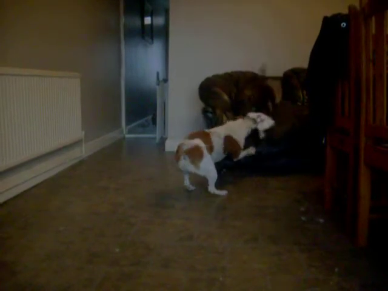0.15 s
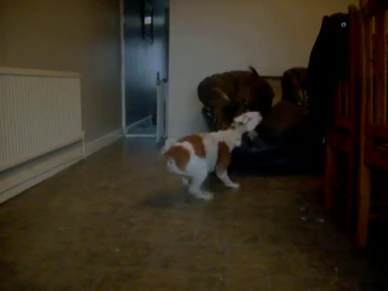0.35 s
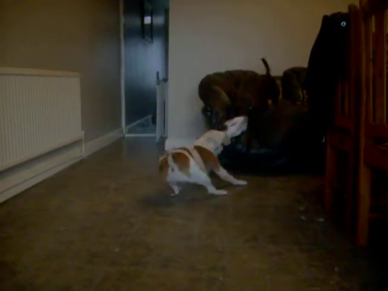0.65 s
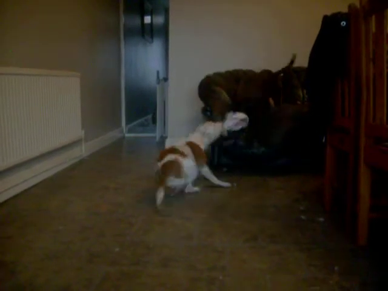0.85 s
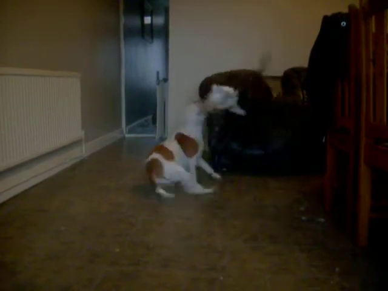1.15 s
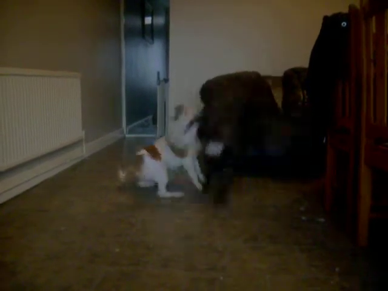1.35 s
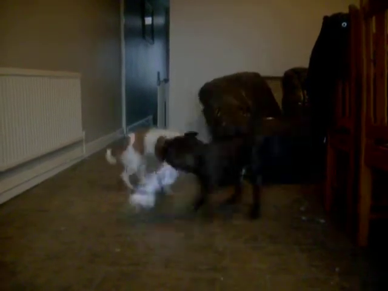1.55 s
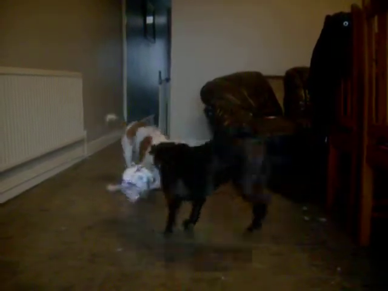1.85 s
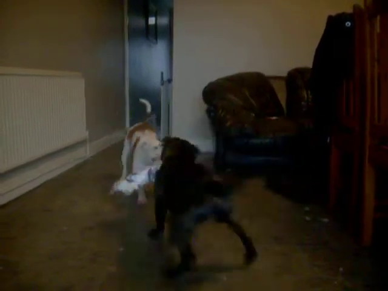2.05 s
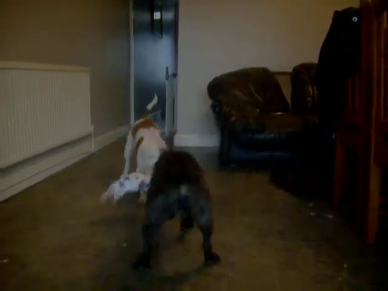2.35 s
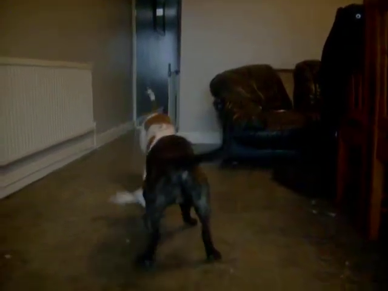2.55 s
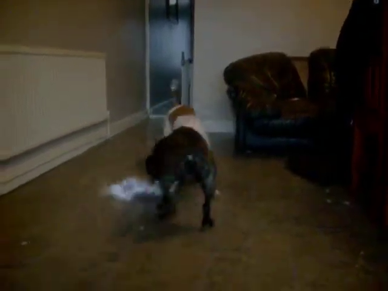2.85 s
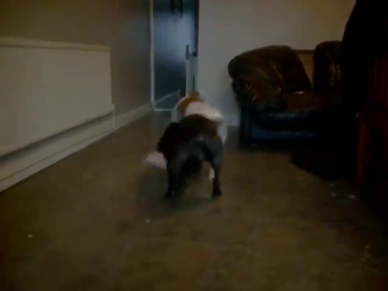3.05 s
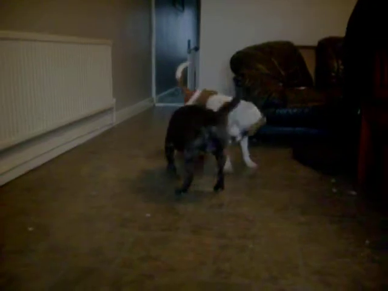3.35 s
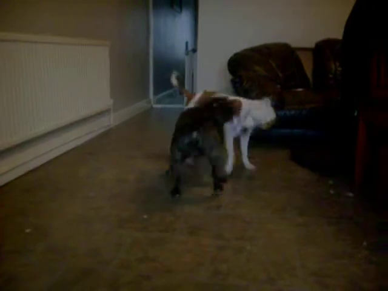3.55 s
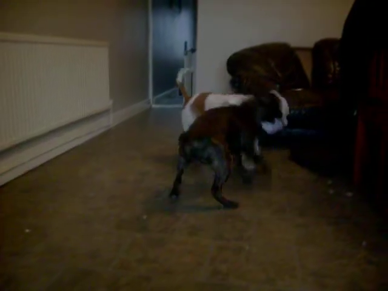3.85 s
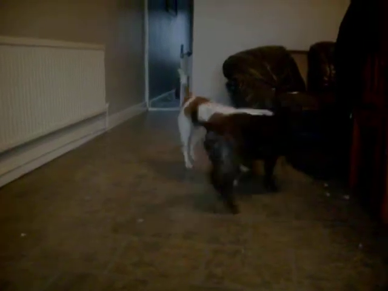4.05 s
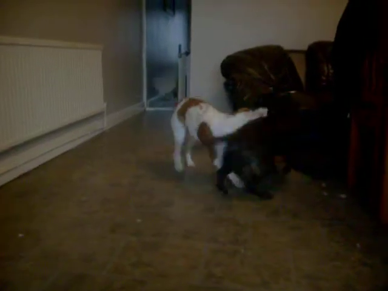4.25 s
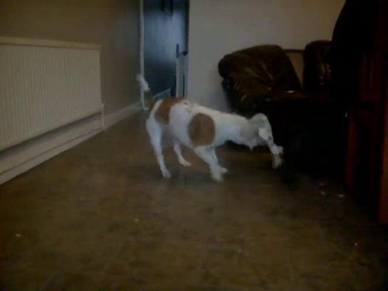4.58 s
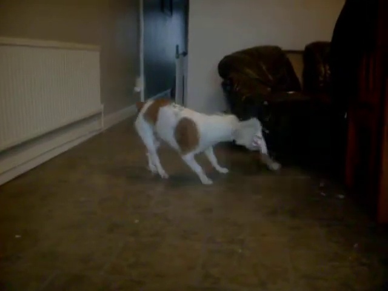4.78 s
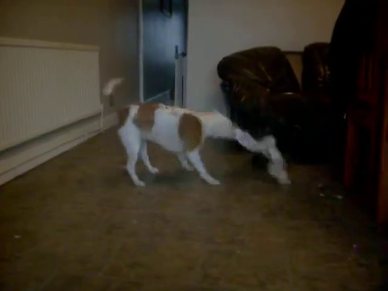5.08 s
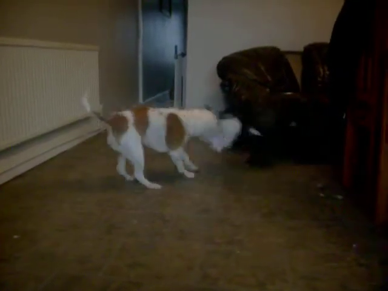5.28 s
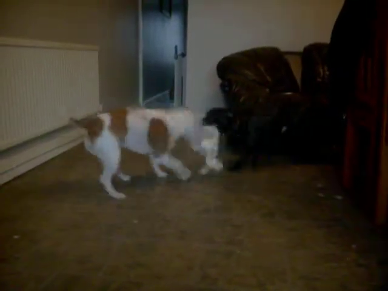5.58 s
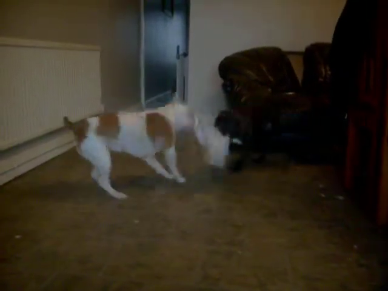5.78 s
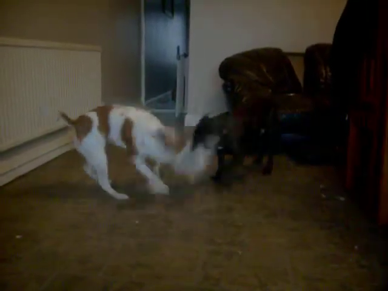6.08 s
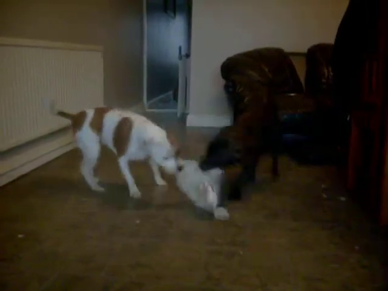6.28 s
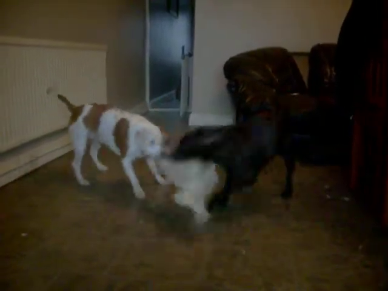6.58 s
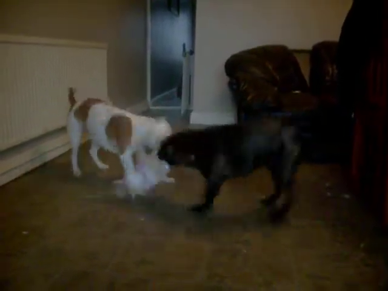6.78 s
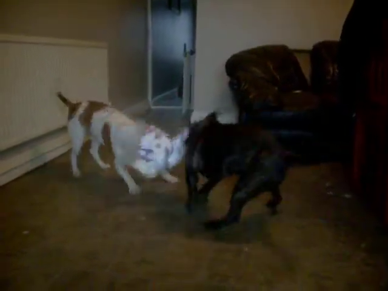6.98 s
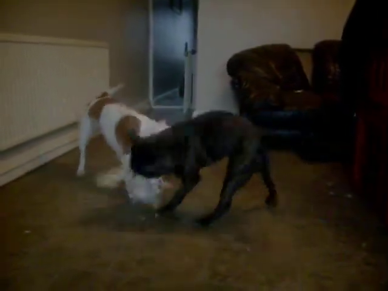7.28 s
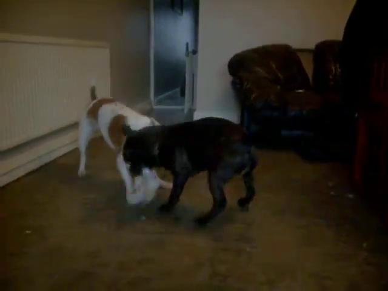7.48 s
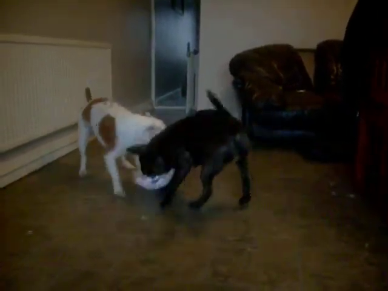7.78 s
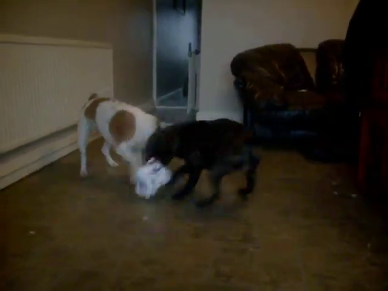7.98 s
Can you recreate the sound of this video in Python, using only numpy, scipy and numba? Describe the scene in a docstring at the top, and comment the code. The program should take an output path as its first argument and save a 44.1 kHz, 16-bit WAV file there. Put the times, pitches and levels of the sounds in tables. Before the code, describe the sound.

Two dogs tug at a cloth in a bare, hard-floored room. Short, low, raspy growls and fluttering snorts come in quick bursts through clenched jaws, while paws skid and scrabble almost constantly. Sharp claw clicks, often doubled, punctuate the struggle. The room rings for about half a second after each, heard a few metres away on a small, thin camera microphone with faint hiss.

```python
"""Two dogs tug at a cloth toy in a bare room with a hard floor, a few metres from a small camera microphone.
From the start they growl through clenched jaws (pulses and rasp ringing in belly, chest, throat and mouth),
snort (fluttering noise in moving resonances) and skid (dense tiny catches over noise). From 0.28 s to the end
come short cracks, each with a second one close by: mostly claw strikes, with a few scuffs and snort onsets.
The room rings around it all for about half a second (fading noise and low modes), over a faint steady hiss."""
import sys
import numpy as np
from scipy import signal
from scipy.fft import rfft, irfft
from scipy.io import wavfile
from scipy.ndimage import uniform_filter1d
from numba import njit

SR = 44100
rng = np.random.default_rng(int(sys.argv[2]) if len(sys.argv) > 2 else 0)


def store_wav(level_fs):
    """Save 16-bit WAV to argv[1]."""
    pcm = np.round(np.clip(np.atleast_2d(level_fs), -1, 1) * 32767)
    wavfile.write(sys.argv[1], SR, pcm.T.astype(np.int16))


def amplitude_ratio(level_db):
    """Convert a level in decibels to the matching linear amplitude (field) ratio."""
    exponent = np.asarray(level_db, float) / 20
    return 10 ** exponent


N = 358533
T = np.arange(N) / SR


def level(x, db):
    """Scale to an rms level in dB."""
    return x * amplitude_ratio(db) / np.sqrt(np.mean(x ** 2))


def colour(x, points):
    """Shape the spectrum by (Hz, dB) points with a causal, minimum-phase response."""
    hz, db = np.transpose(points)
    size = 4096
    grid_hz = np.arange(size // 2 + 1) * SR / size
    gain_db = np.interp(np.log(grid_hz + 1), np.log(hz), db)
    cepstrum = irfft(np.log(amplitude_ratio(gain_db)))
    # folding the cepstrum onto positive times makes the response causal
    cepstrum[1:size // 2] *= 2
    cepstrum[size // 2 + 1:] = 0
    response = irfft(np.exp(rfft(cepstrum)))
    return signal.fftconvolve(x, response)[:len(x)]


@njit
def svf(x, hz, width):
    """State-variable band-pass with a moving centre, gain 1 at the centre."""
    y, b, l = np.empty(len(x)), 0., 0.
    for i in range(len(x)):
        g, k = np.tan(np.pi * hz[i] / SR), width / hz[i]
        v = (b + g * (x[i] + 1e-18 - l)) / (1 + g * (g + k))
        b, l, y[i] = 2 * v - b, l + 2 * g * v, k * v
    return y


def band(x, hz, width):
    """A resonance applied twice, for steep flanks; width in Hz is that of one pass."""
    centre = hz * np.ones(len(x))
    once = svf(x, centre, 1. * width)
    return svf(once, centre, 1. * width)


def walk(rate):
    """Random levels, rate of them a second, joined by straight slopes; spread near 1."""
    k = int(SR / rate)
    steps = np.repeat(rng.standard_normal(N // k + 1), k)
    return 1.2 * uniform_filter1d(steps, k)[:N]


def bouts(rows, rise_db_per_s, fall_db_per_s, glide_s=0.017):
    """Each bout rises, holds and falls; the loudest one sets the level and the other columns, which glide."""
    start, held, db, *columns = np.transpose(rows)[:, :, None]
    rise_db = rise_db_per_s * np.maximum(start - T, 0)
    fall_db = fall_db_per_s * np.maximum(T - start - held, 0)
    levels = db - rise_db - fall_db
    loudest = np.argmax(levels, axis=0)
    glides = [uniform_filter1d(c[loudest, 0], int(glide_s * SR)) for c in columns]
    return [np.max(levels, axis=0)] + glides


# Spectrum of the steady hiss. Each row: frequency in Hz, relative density in dB per Hz.
HISS_SPECTRUM = [(20, 16.5), (60, 12), (200, 5), (1000, 9.5), (4000, -6), (11000, 15)]


def hiss():
    """Steady noise with its own spectrum, strongest in the bass and at the top."""
    return level(colour(rng.standard_normal(N), HISS_SPECTRUM), -46)


# How the bare room rings. Each row: frequency in Hz, time to fade by 60 dB in seconds, tail level in dB.
ROOM_FADE = [(125, 0.52, -3.5), (500, 0.38, -1), (1500, 0.53, -0.5), (2255, 0.52, 0.5), (2850, 0.67, 9.5),
             (3800, 0.74, -0.5), (5600, 1, 0.5), (10100, 0.12, -2.5)]
# Low resonances between the walls. Each row: frequency in Hz, level among the modes in dB,
# time to fade by 60 dB in seconds.
LOW_MODES = [(79.1, 14, 0.33), (136, 15.5, 0.29), (213.4, 5, 0.89), (279, -5.5, 0.64), (537, 3.5, 0.68),
             (832, 8, 0.88)]


def tail(first_s=0.0006, build_s=0.00025):
    """Diffuse reflections for one place in the room, fading octave by octave, with the low modes."""
    t = np.arange(int(.7 * SR)) / SR
    hz, t60, db = np.transpose(ROOM_FADE)
    diffuse = 0
    for f in 60 * 2. ** np.arange(8):
        s = np.interp(np.log(f), np.log(hz), t60)
        fade = np.exp(-np.log(1000) * t / s)
        # each octave is scaled so that a quicker fade keeps its energy
        diffuse = diffuse + np.sqrt(30 / s / SR) * band(rng.standard_normal(len(t)), f, f) * fade
    build_up = 1 - np.exp(-np.maximum(t - first_s, 0) / build_s)
    diffuse = colour(diffuse, np.c_[hz, db]) * build_up
    modes = sum(amplitude_ratio(g) * np.sin(2 * np.pi * f * t) * np.exp(-np.log(1000) * t / s) for f, g, s in LOW_MODES)
    return diffuse + amplitude_ratio(-21) * modes / np.sqrt(np.sum(modes ** 2))


def room(x, count=25):
    """The dogs keep moving, so every third of a second sends its sound into a different pattern of reflections."""
    out, hop = np.zeros(N), N // (count - 1) + 1
    for k in range(count):
        start, stop = max((k - 1) * hop, 0), min((k + 1) * hop, N)
        # neighbouring places crossfade at equal power
        share = np.cos(np.pi / 2 * (np.arange(start, stop) / hop - k))
        echo = signal.fftconvolve(share * x[start:stop], tail())[:N - start]
        out[start:start + len(echo)] += echo
    return out


# Paws skidding on the hard floor; the short bright row at 2.925 s is the tip of a claw strike.
# Each row: start in seconds, time held in seconds, relative level in dB, relative treble in dB.
SKIDS_AND_TIP = [(0.0, 0.17, -47.5, -16), (.3, 0.13, -44, -20), (.52, 0.39, -44.5, -21),
                 (1.07, .19, -39.5, -20), (1.32, 0.42, -43.5, -16), (1.83, 0.21, -42, -13.5),
                 (2.2, 0.11, -54, -20), (2.64, 0.24, -45.5, -25), (2.925, .06, -42, -7),
                 (3.0, 0.13, -45, -32), (3.15, 0.15, -36, -29), (3.8, .2, -51, -7), (4.07, 0.55, -40, -29),
                 (4.5, .4, -38, -19.5), (5.0, 0.18, -40.5, -16), (5.46, 0.49, -42.5, -24),
                 (5.92, 0.1, -42, -23), (6.12, 0.048, -39.5, -11.5), (6.46, 0.16, -47, -28),
                 (6.7, .12, -41.5, -22), (6.9, 0.16, -36.5, -18.5), (7.19, 0.073, -45, -24),
                 (7.43, 0.21, -48, -33), (7.66, 0.62, -47, -23)]


def skid(catches_per_s=900, spread_db=5):
    """Dense tiny claw catches over the hiss of sliding pads; one short bright burst is a claw tip."""
    db, bright_db = bouts(SKIDS_AND_TIP, rise_db_per_s=303, fall_db_per_s=61)
    caught = rng.random(N) < catches_per_s / SR
    strength_db = spread_db * np.minimum(rng.exponential(size=N), 3.5)
    catches = caught * rng.standard_normal(N) * amplitude_ratio(strength_db)
    rub = level(catches, 0) + level(rng.standard_normal(N), -4)
    uneven_db = 2.5 * walk(30)
    body = level(band(rub, 2760, 6700), -5.5)
    treble = amplitude_ratio(bright_db) * level(band(rub, 8210, 11000), 12.2)
    return amplitude_ratio(db + uneven_db) * (body + treble)


# Claws striking the floor, with a few soft scuffs and snort onsets among them.
# Each row: time in seconds, relative level in dB, dull part against hard part in dB before their resonances,
# share sent to the walls in dB.
CLAWS_AND_SCUFFS = [(0.2849, -17, -18, -3.5), (0.2928, -15.5, -35, 2.5), (0.7434, -27.5, 1, 9.5),
                    (1.069, -32, -21, 6.5), (1.3187, -34, 6.5, 7), (1.3941, -18, -16, 4),
                    (1.5081, -17.5, -8, -0.5), (1.5274, -31.5, -5, 4), (1.6481, -14.5, -35, -2.5),
                    (1.8186, -27.5, -30, 9), (1.984, -11, -30, -4), (2.0044, -18, -23, 1),
                    (2.192, -30, -33, 2.5), (2.2388, -22, -37, 1.5), (2.2927, -16.5, -26, -2.5),
                    (2.6335, -31, -17, 6.5), (2.7872, -30, -4.5, 9), (2.9246, -19, -12, -3.5),
                    (3.142, -18.5, -44, 3.5), (3.274, -32, -16, 3.5), (3.7476, -14, -42, -3),
                    (3.8686, -23, -4.5, -0.5), (3.978, -26, -9, 1), (4.0786, -27, -16, 6.5),
                    (4.2488, -22.5, -4, 7.5), (4.4726, -19, -35, 4), (4.6749, -18, -4, 1),
                    (5.006, -26.5, -31, -3), (5.022, -19, -29, -1.5), (5.456, -23.5, -14, 1),
                    (5.485, -29, -31, -1), (5.6218, -18, -4.5, -0.5), (5.7056, -25, -26, 5.5),
                    (5.9156, -25.5, -35, -4), (5.9661, -18.5, -3, -3), (6.131, -26.5, -5.5, 10.5),
                    (6.4404, -18, -16, 0.5), (6.6473, -41, 14.5, 0), (6.6865, -15, -34, -2.5),
                    (7.1699, -10.5, -32, 0.5), (7.186, -20, -16, -17), (7.417, -14.5, -43, -2),
                    (7.662, -32, -5, 8.5), (7.815, -31.5, -7.5, 9.5), (7.834, -29, -13, 2),
                    (7.9235, -19.5, -26, -3.5), (7.9736, -21.5, -24, 3)]


def claws_and_scuffs(contact_s=0.00066, grit=0.12, second_lag_s=.003, second_db=-2):
    """A claw strike is a short crack of dull pad, hard claw and bright tip, and a second toe follows close by;
    the few scuffs and snort onsets use the same cracks. Rows: direct sound, first cracks sent to the walls."""
    pad, claw = np.zeros((2, 2, N))
    t = np.arange(400) / SR
    count = len(CLAWS_AND_SCUFFS)
    # a single click followed by gritty, fading noise, at equal energy
    cracks = grit * rng.standard_normal((count, len(t))) * np.exp(-t / contact_s)
    cracks[:, 0] = 1
    cracks /= np.sqrt(np.sum(cracks ** 2, axis=1, keepdims=True))
    lags = (second_lag_s * SR * (.5 + rng.random(count))).astype(int)
    for (s, db, pad_db, walls_db), crack, lag in zip(CLAWS_AND_SCUFFS, cracks, lags):
        i = int(s * SR)
        pair = crack + amplitude_ratio(second_db) * np.roll(crack, lag)
        both = np.array([pair, amplitude_ratio(walls_db) * crack])
        pad[:, i:i + len(t)] += amplitude_ratio(db + pad_db) * both
        claw[:, i:i + len(t)] += amplitude_ratio(db) * both
    rows = []
    for p, c in zip(pad, claw):
        dull = amplitude_ratio(22) * band(p, 1950, 1840)
        hard = amplitude_ratio(16) * band(c, 3690, 5180)
        tip = amplitude_ratio(20) * band(c, 10360, 4700)
        rows.append(dull + hard - tip)
    return rows


# Snorts and pants into the cloth. Each row: start in seconds, time held in seconds, relative level in dB,
# nose resonance in Hz.
SNORT_BOUTS = [(0.0, 0.026, -37, 1300), (.155, 0.017, -30, 1500), (.51, 0.14, -41, 1800),
               (.64, 0.096, -31.5, 1970), (.73, 0.089, -29, 1620), (1.14, 0.076, -47, 1930),
               (1.33, 0.17, -35.5, 1520), (1.85, 0.039, -36, 1830), (2.29, 0.032, -41.5, 1790),
               (2.41, 0.062, -43, 1500), (2.78, 0.5, -51, 1610), (3.27, 0.14, -34, 1510),
               (4.07, 0.16, -39, 1700), (4.23, 0.035, -39, 1830), (4.46, 0.035, -44.5, 1920),
               (4.66, 0.07, -42.5, 1760), (4.81, 0.24, -42, 1370), (5.165, 0.042, -35.5, 1676),
               (5.58, 0.093, -36.5, 1730), (6.11, 0.087, -39, 1930), (6.6, 0.16, -46, 1670),
               (6.92, 0.13, -40.5, 1750), (7.16, 0.053, -40.5, 1510), (7.42, .05, -43.5, 1950),
               (7.75, .33, -46.5, 1870)]


def snort(flutter_db=3.5):
    """Air forced past nose and cloth: fluttering turbulence in a moving and a fixed resonance."""
    db, nose_hz = bouts(SNORT_BOUTS, rise_db_per_s=401.5, fall_db_per_s=152)
    air = amplitude_ratio(flutter_db * walk(60)) * rng.standard_normal(N)
    nose = level(band(air, nose_hz, 650), -10.5)
    broad = level(band(air, 1650, 1550), -6.5)
    return amplitude_ratio(db) * (nose + broad)


@njit
def flaps(rate, stretch, size):
    """A pulse at each wrap of the phase; every cycle has its own length and strength."""
    pulses, phase, p, k = np.zeros(len(rate)), np.empty(len(rate)), 0., 0
    for i in range(len(rate)):
        p += rate[i] * stretch[k] / SR
        if p >= 1:
            p, k = p - 1, k + 1
            pulses[i] = size[k]
        phase[i] = p
    return pulses, phase


# Growls through clenched jaws. Each row: start in seconds, time held in seconds, relative level in dB,
# chest against that level in dB, mouth resonance in Hz.
GROWL_BOUTS = [(0.0, 0.015, -37.5, -10.5, 774), (.12, .09, -43.5, -14.5, 840), (.49, .06, -43, -9.5, 917),
               (.57, 0.12, -37, -13, 810), (.76, 0.086, -46, -4.5, 930), (1.1, 0.28, -55.5, -1.5, 905),
               (1.41, 0.096, -41, -15.5, 826), (1.88, .07, -48, -10.5, 800), (2.7, .08, -41.5, -10.5, 914),
               (2.79, 0.14, -37.5, -12.5, 870), (3.0, 0.099, -36, -17, 926), (3.27, 0.032, -26, -14, 960),
               (3.34, 0.038, -34, -16, 896), (3.99, 0.056, -49.5, -9, 830), (4.05, 0.1, -44.5, -8, 764),
               (4.23, 0.029, -43.5, -10, 790), (4.65, 0.12, -50, -6, 916), (4.8, 0.089, -45, -8, 890),
               (5.16, 0.078, -44.5, -16.5, 800), (5.64, 0.11, -46.5, -15.5, 880),
               (5.85, 0.14, -60, -7.5, 826), (6.12, 0.071, -41.5, -11, 870), (6.62, .04, -44, -7, 884),
               (6.69, 0.061, -38.5, -10.5, 930), (6.9, 0.16, -40.5, -8, 840), (7.16, 0.036, -46, -13, 1010),
               (7.64, .05, -51.5, -5.5, 840), (7.71, 0.29, -41.5, -13, 858), (7.99, 0.11, -40, -9.5, 930)]
# Resonances of the throat. Each row: frequency in Hz, width of one filter pass in Hz, relative level in dB.
THROAT_RESONANCES = [(585, 300, -5.5), (1103, 380, -5)]


def growl(flaps_per_s=70, jitter=.08, scatter_db=3.5, rasp_db=-8, belly_db=-3.5):
    """Slack vocal folds flap unevenly, each flap followed by a rasp of air; belly, chest, throat and mouth ring."""
    db, chest_db, mouth_hz = bouts(GROWL_BOUTS, rise_db_per_s=296, fall_db_per_s=113)
    rate = flaps_per_s * np.exp(.1 * walk(4))
    chance = rng.standard_normal((N // 200, 2)).T
    pulses, phase = flaps(rate, np.exp(jitter * chance[0]), amplitude_ratio(scatter_db * chance[1]))
    rasp = np.exp(-phase / 0.36) * rng.standard_normal(N)
    folds = level(pulses, 0) + level(rasp, rasp_db)
    belly = amplitude_ratio(chest_db + belly_db) * level(band(folds, 91.5, 38), 0.53)
    chest = amplitude_ratio(chest_db) * level(band(folds, 241, 196), 4.16)
    # neighbouring throat resonances have opposite sign
    throat = sum((-1) ** k * level(band(folds, hz, w), g) for k, (hz, w, g) in enumerate(THROAT_RESONANCES))
    mouth = level(band(folds, mouth_hz, 373), 0)
    voice = level(mouth - throat, -1.43) + chest - belly
    uneven_db = 2.33 * walk(28)
    return amplitude_ratio(db + uneven_db) * voice


def scene():
    """Both dogs in the room, over a faint steady hiss."""
    dogs = amplitude_ratio(-6) * (growl() + snort() + skid())
    cracks, cracks_to_walls = claws_and_scuffs()
    reflections = room(dogs + cracks_to_walls)
    return (dogs + cracks + reflections + hiss())[None]


def top_cut(x):
    """Nothing passes above the cut-off."""
    return signal.sosfilt(signal.butter(12, 12120, fs=SR, output="sos"), x)


# Response of the small camera microphone. Each row: frequency in Hz, gain in dB.
CAMERA_MICROPHONE = [(40, -13.5), (70, -5.5), (2300, 3.5), (2950, 8), (4000, 0.5), (5500, -8), (8500, -22),
                     (10400, -29), (12000, -44)]


def record(dry):
    """The small microphone peaks near 3 kHz and loses the bass and the top."""
    heard = colour(dry[0], CAMERA_MICROPHONE)[None]
    return top_cut(heard)


dry = scene()
out = record(dry)
store_wav(out)
```